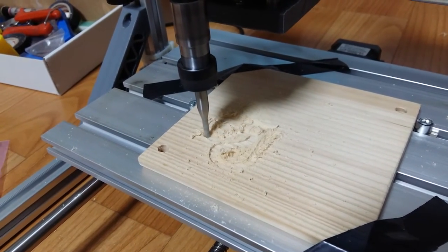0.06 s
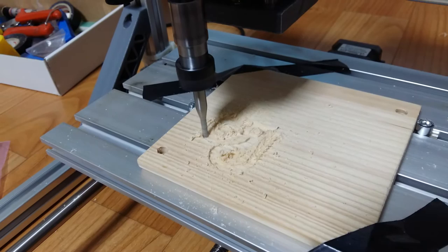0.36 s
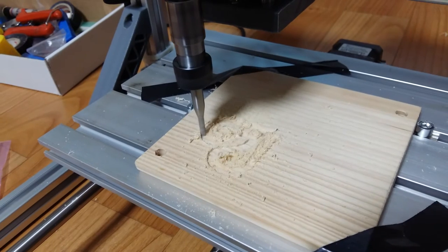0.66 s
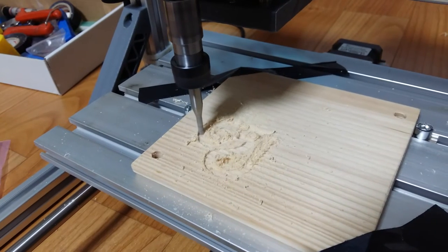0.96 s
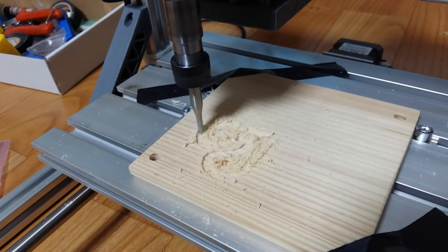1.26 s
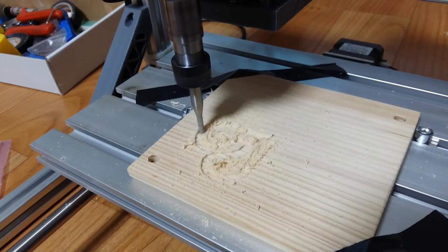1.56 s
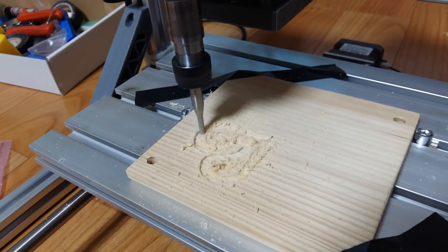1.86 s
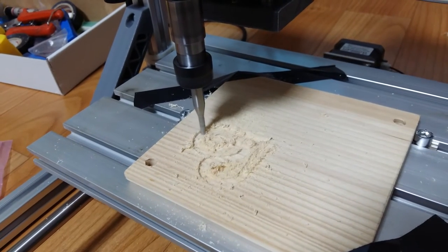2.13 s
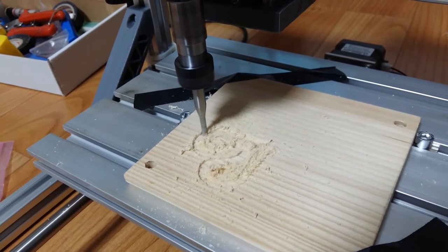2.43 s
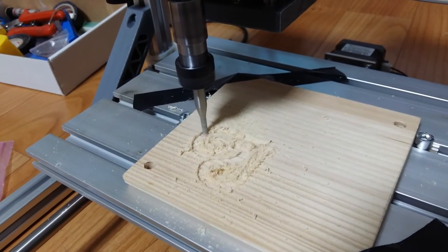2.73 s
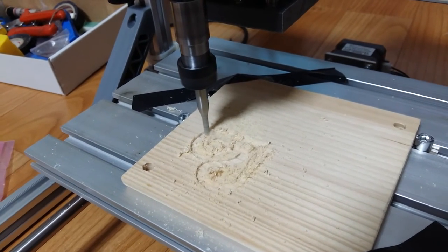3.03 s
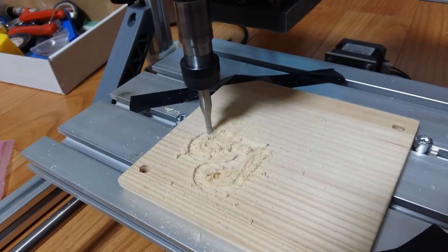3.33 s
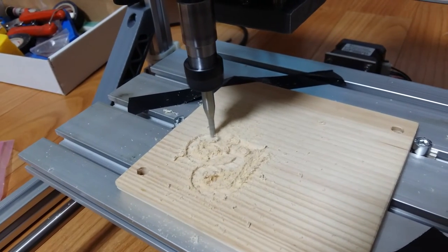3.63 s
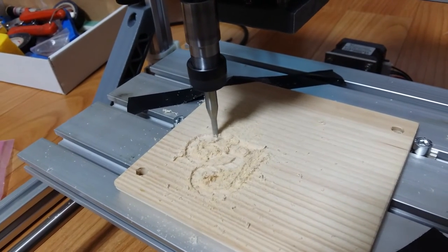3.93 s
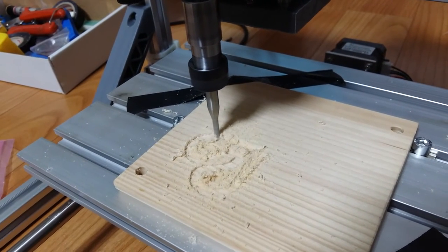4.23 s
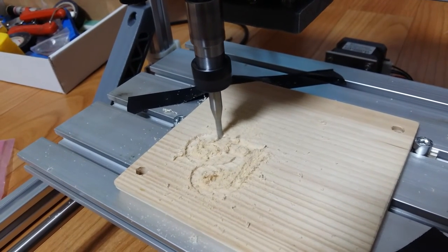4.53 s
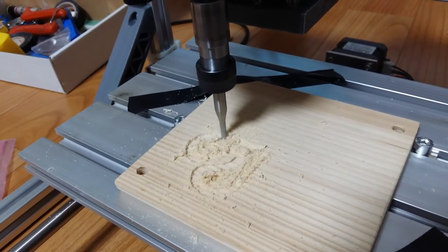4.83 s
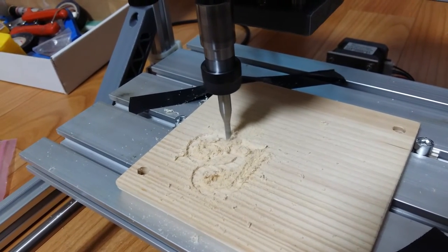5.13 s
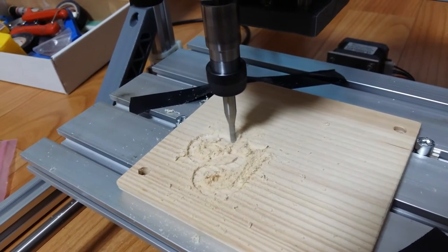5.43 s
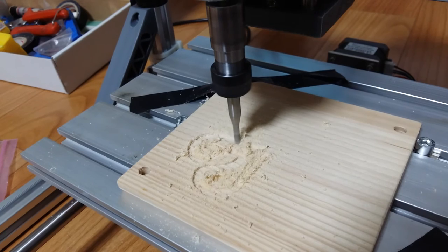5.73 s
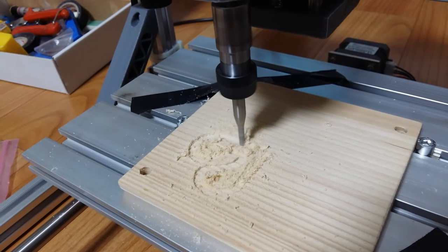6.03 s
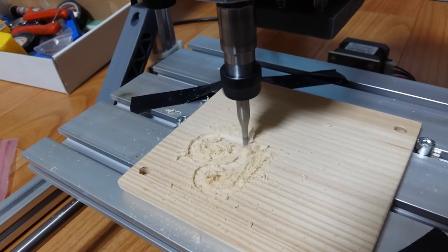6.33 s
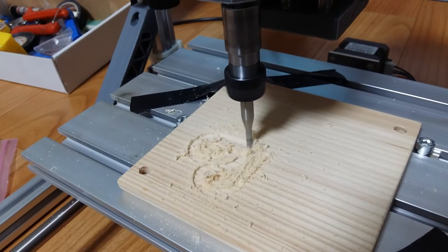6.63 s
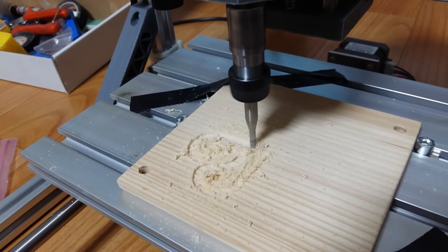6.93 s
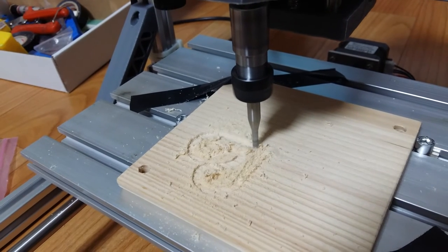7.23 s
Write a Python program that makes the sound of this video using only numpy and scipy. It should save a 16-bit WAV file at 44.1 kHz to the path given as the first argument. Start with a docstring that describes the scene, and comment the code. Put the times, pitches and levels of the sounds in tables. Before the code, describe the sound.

A small CNC router carves a wooden board, heard close on a hand-held stereo microphone in a small room. Its spindle whines at high speed for the whole seven seconds, over a light hum, with scraping motor brushes, a thin high bearing rattle and a fizz of dust that grows slightly. The pitch barely dips under load. Faint feed motor tones sit behind it until about 2.5 seconds.

In front, the bit bites the wood with a buzzing chatter and a dry rasp of tearing fibres. The bites are short and irregular for the first two seconds, with a small splinter cracking off near 0.4. The cutting eases from about 2.2 to 2.7, resumes with a faint splinter, tears harder around 3.4, then continues in longer, steadier passes to the end. Brief squeals come from the bit, mostly in the first three seconds, and again near 4.2, 4.6 and 6.2.

```python
"""A small room, a hand-held stereo microphone close to a small CNC router carving a wooden board.
Feed motors sing faintly behind the spindle, which turns about 151 times a second: it hums and whines
on its shaft orders (multiples of that rate), its brushes scrape and its bearings rattle near 6 kHz.
In front, the bit shakes the frame near 1.2 kHz as it bites, tears fibres and squeals in the grain;
dust fizzes off it and a few splinters break away."""
import sys
import numpy as np
from scipy import signal
from scipy.fft import rfft, irfft, next_fast_len
from scipy.io import wavfile

SR = 44100
rng = np.random.default_rng(int(sys.argv[2]) if len(sys.argv) > 2 else 0)


def generate_wav(signal):
    """Clip the signal to [-1, 1] and save it as 16-bit WAV at the path in sys.argv[1]."""
    frames = np.transpose(np.atleast_2d(signal))
    scaled = np.clip(frames, -1, 1) * 32767
    pcm = np.round(scaled).astype(np.int16)
    wavfile.write(sys.argv[1], SR, pcm)


N = 320607

# How alike noise is on the two sides of the microphone: frequency_hz, correlation
STEREO_LIKENESS = [(200, 0.89), (1300, 0.59), (2500, 1), (5000, 0.017), (12000, 0.027)]
# Feed motor notes: start_s, end_s, pitch_hz, level_db
FEED_NOTES = [(-.2, 2.2, 900, -48), (-.2, 2.5, 936, -53.5)]
# The spindle slows where the cut is heavy: time_s, turns_per_s
SPINDLE_SPEED = [(.2, 151.4), (.5, 150.3), (.65, 151.2), (.82, 150.6), (1.15, 151.05), (1.65, 151.15),
                 (2.08, 150.25), (2.4, 151.1), (2.8, 151.15), (3.2, 150.15), (3.36, 150.9), (3.56, 150.15),
                 (3.9, 151.05), (4.5, 151.05), (4.75, 151.4), (5.3, 151.35), (5.55, 151.7)]
# Slow levels of the lowest shaft orders: time_s, unbalance_db, second_order_db, side_load_db
HUM_LEVELS = [(0, -55, -62.5, -47), (1.05, -52.5, -65, -44.5), (2.3, -52.5, -54, -41), (3, -52, -50, -42.5),
              (4, -49.5, -54, -40), (6.3, -50, -56, -43), (7.27, -50, -60, -40.5)]
# Shaft orders 3 to 6, relative to the side load: gain_db
SIDE_LOAD_ORDERS = [-5.5, -9.5, -1.5, -5.5]
# Slow levels of the motor's bands: time_s, low_whine_db, high_whine_db, housing_db
MOTOR_BANDS = [(0, -31, -23, -16), (.45, -29, -18.5, -23), (1.15, -26.5, -22, -20),
               (1.9, -25.5, -20.5, -21.5), (2.5, -29, -22.5, -24.5), (3, -26.5, -19, -29.5),
               (3.7, -28, -19.5, -26), (5.1, -25.5, -19, -25.5), (6.4, -32, -19.5, -24),
               (7.27, -28, -20.5, -26)]
# Shaft orders from 10 upwards: level_db, trend_db_per_s, left_over_right_db, right_lag_rad
WHINE_ORDERS = [(-40, 0, 3, 1.5), (-43, 2, -9, 2.5), (-38.5, -0.5, 3.5, 1.86), (-46.5, -1.6, 4, 0.3),
                (-33.5, 0.56, -3, 1.3), (-37.5, 0.85, -4, 1.75), (-40, -1.0, -3, 2.5),
                (-37.5, 0.1, -1.5, 2.5), (-45, 0, -13, 1.5), (-49, 2.5, 4, 2), (-39, -0.5, -1.5, 0.87),
                (-36, -0.1, 2, 2.9), (-37, 1, -1, 1.9), (-40.5, 0.3, -4, 2), (-41, 0, -5.5, -1),
                (-36, -1, 6.5, 3), (-47, 0.5, 8, -1), (-38.5, 1.3, 20, 0.5), (-40, 0.5, 12, 0.5),
                (-38, -2, -4, 3.5), (-47, 3, 0, -2), (-42, -1.4, -11, 0.5), (-36, 1.9, 0, 2),
                (-32.5, 0.8, -18, 3.0), (-39.5, -0.5, -9, 0), (-40.5, 1.3, -17, 0.2),
                (-31, 0.4, -10.5, 2.5), (-28, 0.3, -3, 1.5), (-35, -0.5, -10, 2), (-30.5, 0.5, -3, 1.5),
                (-29, 0.5, 7, -1.2), (-31, 0.6, -7.5, 1.5), (-31.5, -1, -5, 4.5)]
# Spectra of the brushes, the dust and the bearings: frequency_hz, relative_db
BRUSH_SPECTRUM = [(50, -33), (200, -18.5), (500, -16), (850, -4), (1700, -4.5), (2200, -1.5), (2800, -4),
                  (3300, -0.5), (3900, -5.5), (4150, 2), (4500, -7), (6000, -10), (9000, -43)]
DUST_SPECTRUM = [(4000, -32), (7000, 2), (8300, -2.5), (9300, 3), (9800, -2), (12200, -8.5), (14000, -10.5),
                 (15700, -17)]
BEARING_SPECTRUM = [(2000, -54), (4500, -40), (5500, -24), (6000, 1), (6450, 0.5), (6900, -10), (7800, -17),
                    (12000, -37)]
# Where the bearings sit in the stereo image: frequency_hz, left_over_right_db
BEARING_PAN = [(5600, 2.5), (6030, 13), (6200, -28), (6500, 96), (7800, -31)]
# Resonances of the collet and of the frame: pitch_hz, width_hz, relative_db
COLLET_MODES = [(5587, 440, 0)]
FRAME_MODES = [(1069, 23.5, 6), (1230, 39, 6), (1347.7, 19.3, 12.5)]
# The collet's ring, loudest where the bit digs hard: time_s, level_db
COLLET_LEVELS = [(0, -29), (.3, -23), (.45, -19.5), (.78, -26), (1.15, -21.5), (1.3, -29), (2.5, -25),
                 (2.8, -22.5), (3.3, -23), (3.49, -19.5), (3.7, -24), (7.27, -25)]
# Splinters breaking away: middle_s, half_length_s, level_db
SPLINTER_BREAKS = [(.415, .015, -27), (.437, .002, -23), (2.79, .03, -33)]
# The bit sings briefly on one order: middle_s, half_length_s, shaft_order, level_db
BIT_SQUEALS = [(0.062, 0.12, 24, -32.5), (.03, 0.12, 27, -35), (.66, 0.07, 15, -30), (.48, .2, 37, -28),
               (1.2, .5, 37, -33), (1.02, .035, 14, -28.5), (1.15, .25, 33, -35), (1.27, .05, 12, -33),
               (1.62, 0.16, 33, -32), (2.206, 0.045, 14, -27.5), (2.96, 0.064, 14, -27.5),
               (3.11, 0.05, 5, -36), (4.19, 0.05, 14, -30), (4.57, .12, 15, -32), (6.196, .05, 22, -29.5)]
# Spectra of tearing fibres and of snaps knocking the board: frequency_hz, relative_db
TEAR_SPECTRUM = [(400, -21), (1200, -7), (1750, -6), (2250, 8), (2700, -2), (3130, 5), (3800, -15),
                 (5600, -8), (9000, -40)]
SNAP_SPECTRUM = [(250, -55), (750, -16), (1050, 0), (1380, 0), (1650, -14), (2250, -6), (6000, -50)]
# The bit's bites of wood: start_s, length_s, chatter_db, chatter_centre_hz, tear_db
WOOD_BITES = [(-0.05, 0.3, -23, 1273, -30.5), (0.284, 0.26, -27, 1144, -23.5),
              (0.613, 0.18, -20.5, 1236, -27), (0.902, 0.058, -34, 1380, -25.5),
              (0.98, 0.076, -25, 1240, -22.5), (1.093, 0.12, -22.5, 1210, -29.5),
              (1.275, 0.088, -26.5, 1260, -65), (1.524, 0.072, -24, 1460, -40),
              (1.668, 0.22, -27.5, 1300, -38), (1.853, 0.22, -24.5, 1230, -29.5),
              (2.038, 0.15, -24.5, 1304, -42), (2.684, 0.17, -36, 1240, -26), (2.867, 0.17, -27, 1260, -28),
              (3.047, 0.071, -28, 1340, -35), (3.105, 0.29, -31, 1205, -26),
              (3.399, 0.075, -24.5, 1080, -21), (3.484, 0.19, -25.5, 1260, -28.5),
              (3.61, 0.17, -24, 1305, -60), (3.594, .32, -32.5, 1040, -34.5), (3.898, 0.33, -24, 1214, -60),
              (4.3, 0.28, -26.5, 1205, -28), (4.594, 0.92, -29.5, 1152, -30.5), (5.5, 0.39, -30, 1190, -32),
              (5.81, 0.24, -24.5, 1207, -99), (6.041, 0.72, -22, 1147, -37),
              (6.738, 0.56, -26, 1077, -32.5)]

TOP_HZ = 15700
SCRAPE_DB, RATTLE_DB, WHINE_GAIN_DB = -12, -22.5, .8  # the scrape is relative to the high whine band
HUM_PER_EFFORT, WHINE_PER_EFFORT, RATTLE_PER_EFFORT = 0.23, 0.22, 0.028  # dB per dB of cutting effort
FLUTTER, FLUTTER_HZ_PER_ORDER = .75, 1.25  # no two turns are alike, so higher orders are broader
ATTACK_S, RELEASE_S, ARCH_DB = .05, .06, 3  # a bite sinks in, is deepest in its middle, and runs free
CHATTER_ORDERS, CHATTER_WIDTH_HZ = (7, 8, 9), 173.5  # the orders a bite shakes; reach from its centre
GRAZE_CHATTER_DB, GRAZE_CENTRE_HZ, GRAZE_TEAR_DB = -33, 1296, -36.5  # the bit only brushing the groove
GRAIN_DB, GRAIN_HZ = 1.3, 7  # uneven grain makes each chatter order waver
STUTTER_DB, STUTTER_HZ = 1.9, 16
SNAP_DB, SNAP_SPREAD_DB = -3.5, 4.5  # level beside the tearing; spread from turn to turn


def amp(db):
    """Decibels to gain."""
    return 10 ** (np.asarray(db) / 20)


def unit(x):
    """Scale to rms 1."""
    return x / np.sqrt(np.mean(np.abs(x) ** 2) + 1e-20)


def along(points, hz):
    """Read (frequency_hz, value) points on a log axis."""
    point_hz, values = np.transpose(points)
    return np.interp(np.log(hz + 1), np.log(point_hz + 1), values)


def clock():
    """The time of every sample, in seconds."""
    return np.arange(N) / SR


def curves(rows):
    """One value per sample for each column after the time."""
    times, *columns = np.transpose(rows)
    return [np.interp(clock(), times, column) for column in columns]


def centred(curve):
    """A curve about its own average."""
    return curve - np.mean(curve)


def pan(side_db):
    """Left and right gains of constant power; positive is to the left."""
    gains = amp(np.array([np.atleast_1d(side_db), -np.atleast_1d(side_db)]) / 2)
    return gains / np.sqrt(np.mean(gains ** 2, axis=0))


def drift(corner_hz, skirt=10):
    """A random complex curve of rms 1, mostly slower than corner_hz, steeply cut past skirt times that."""
    step = 64
    count = N // step + 2
    hz = np.fft.fftfreq(count, step / SR)
    white = rng.standard_normal(count) + 1j * rng.standard_normal(count)
    slow = np.fft.ifft(white / (1 + 1j * hz / corner_hz) / (1 + 1j * hz / corner_hz / skirt))
    return np.interp(np.arange(N), np.arange(count) * step, unit(slow))


def filtered(x, response):
    """x through a complex frequency response."""
    size = next_fast_len(N + SR // 4)
    return irfft(rfft(x, size) * response(np.fft.rfftfreq(size, 1 / SR)), size)[..., :N]


def noise():
    """White stereo noise, largely alike on both sides low down and unrelated in the treble."""
    def mid_side_gains(hz):
        spread = np.arccos(np.clip(along(STEREO_LIKENESS, hz), -1, 1)) / 2
        return np.array([np.cos(spread), np.sin(spread)])
    mid, side = filtered(rng.standard_normal((2, N)), mid_side_gains)
    return np.array([mid + side, mid - side])


def coloured(x, spectrum):
    """x through a smooth spectrum, at rms 1."""
    return unit(filtered(x, lambda hz: amp(along(spectrum, hz))))


def ringing(x, modes):
    """x through steep-skirted resonances (pitch_hz, width_hz, relative_db), at rms 1."""
    def mode(hz, pitch, width):
        return 1j * hz * width / (pitch * pitch - hz * hz + 1j * hz * width)
    return unit(filtered(x, lambda hz: sum(amp(db) * mode(hz, pitch, width) * mode(hz, pitch, 5 * width)
                                           for pitch, width, db in modes)))


def diffuse(x, t60_s):
    """x through a dense short tail for each side, at rms 1."""
    t = np.arange(SR // 5) / SR
    tail = rng.standard_normal((2, len(t))) * amp(-60 * t / t60_s)
    return unit(signal.fftconvolve(x[None], tail, axes=1)[:, :N])


def partial(phase, rough, width_hz, lag_rad, skirt=10):
    """A fluttering stereo tone of rms 1; the right lags, and each side also flutters on its own."""
    own = np.array([drift(width_hz, skirt), drift(width_hz, skirt)]) * (rough * min(abs(lag_rad), 1) / 2)
    shared = 1 + rough * drift(width_hz, skirt)
    offset = np.exp(.5j * lag_rad * np.array([[1], [-1]]))
    return unit(((offset * shared + own) * np.exp(1j * phase)).real)


def stutter(depth=1):
    """The unsteady gain of a chip that thickens and thins; depth 0 is a smooth cut."""
    return unit(amp(depth * STUTTER_DB * drift(STUTTER_HZ, skirt=2).real))


def feed_motors():
    """Far back in the sound, stepper motors hold faint notes while they feed the table."""
    t, out = clock(), np.zeros((2, N))
    for start, end, hz, db in FEED_NOTES:
        fade = np.clip(np.minimum(t - start, end - t) / 0.22, 0, 1)
        out += amp(db) * fade * partial(2 * np.pi * hz * t, rough=0.29, width_hz=0.93, lag_rad=0.36)
    return out


def shaft_hum(angle, effort_db):
    """Unbalance drives the first two orders; the side load on the bit drives the next four."""
    unbalance_db, second_db, side_load_db = curves(HUM_LEVELS)
    load_db = side_load_db + HUM_PER_EFFORT * effort_db
    out = pan(-1.8) * amp(unbalance_db) * partial(angle, rough=0.27, width_hz=11.0, lag_rad=0.29)
    out += pan(2.6) * amp(second_db) * partial(2 * angle, rough=0.41, width_hz=8.8, lag_rad=0.24)
    for order, db in enumerate(SIDE_LOAD_ORDERS, 3):
        out += pan(1.1) * amp(db + load_db) * partial(order * angle, rough=.75, width_hz=6, lag_rad=0.34)
    return out


def brushes_and_dust(angle, high_whine_db):
    """Brushes scrape and tick each turn; dust fizzes off the bit, which whistles and rings ever more."""
    pulse = amp(1.3 * np.cos(angle) + 1.8 * np.cos(2 * angle) + drift(8).real)
    scrape = amp(high_whine_db + SCRAPE_DB) * coloured(noise() * pulse, BRUSH_SPECTRUM)
    ticks = np.diff(np.floor(angle / (2 * np.pi)), prepend=0)
    fizz = unit(noise() * np.sqrt(pulse)) + amp(-9) * diffuse(ticks, t60_s=.05)
    progress = clock() * SR / N
    dust = amp(-33.5 + 2 * progress + 1.4 * drift(17).real) * coloured(fizz, DUST_SPECTRUM)
    ring = amp(-48.5 + 10.6 * progress) * pan(3) * ringing(fizz, [(8660, 85, 1), (8680, 71, -6)])
    whistle = amp(-53) * ringing(fizz, [(13100, 110, 0)])
    return scrape + dust + ring + whistle


def bearing_rattle(angle, effort_db, collet_db, scatter_s, uneven_db, diffuse_db):
    """The shaft rubs and knocks three times a turn, never quite alike, ringing bearings and collet."""
    turns = angle / (2 * np.pi)
    whole_turns = np.arange(int(turns[-1]))
    knocks = np.zeros(N)
    for turn_fraction, db in [(.05, -18), (.5, -10.5), (.72, -9)]:
        timing, strength = rng.standard_normal((len(whole_turns), 2)).T
        at_s = np.interp(whole_turns + turn_fraction, turns, clock()) + scatter_s * timing
        samples = np.clip(np.round(at_s * SR).astype(int), 0, N - 1)
        knocks += np.bincount(samples, amp(db + uneven_db * strength), N)
    rub = unit(noise() * amp(4.5 * np.cos(2 * angle) + 3.5 * np.cos(angle)))
    drive = unit(knocks) + amp(diffuse_db) * diffuse(knocks, t60_s=0.19) + 1.7 * rub
    bearings = filtered(coloured(drive, BEARING_SPECTRUM), lambda hz: pan(along(BEARING_PAN, hz)))
    collet = pan(-20) * ringing(drive, COLLET_MODES)
    return amp(RATTLE_DB + RATTLE_PER_EFFORT * effort_db) * bearings + amp(collet_db) * collet


def motor_whine(angle, bands_db):
    """Commutator, fan and flute repeat every turn; each order flutters and slowly grows or fades."""
    swells_db = [centred(db) for db in bands_db]
    from_middle_s = centred(clock())
    out = np.zeros((2, N))
    for order, (db, trend, side_db, lag_rad) in enumerate(WHINE_ORDERS, 10):
        # each order swells with the part of the machine that rings at its pitch
        band = np.searchsorted([19, 32, 40], order, side="right")
        phase = order * angle + rng.uniform(0, 2 * np.pi)
        tone = partial(phase, FLUTTER, FLUTTER_HZ_PER_ORDER * order, lag_rad, skirt=1.0)
        out += pan(side_db) * amp(db + swells_db[band] + trend * from_middle_s) * tone
    return amp(WHINE_GAIN_DB) * stutter(depth=.5) * out


def thud(middle_s, half_length_s, level_db):
    """One soft low thud."""
    rumble = coloured(noise(), [(110, 0), (250, -31), (800, -90)])
    return amp(level_db) * np.exp(-((clock() - middle_s) / half_length_s) ** 2) * rumble


def splinters():
    """Each splinter breaks away with a short broad rasp."""
    rasp = coloured(noise(), [(200, -40), (1200, 0), (4500, -3), (12000, -22)])
    return rasp * sum(amp(db) * np.exp(-((clock() - middle_s) / half_s) ** 2)
                      for middle_s, half_s, db in SPLINTER_BREAKS)


def bit_squeals(angle):
    """Where the grain grips the bit, one order sings out roughly, stutters and breaks off."""
    grips, out = {}, np.zeros((2, N))
    for middle_s, half_s, order, db in BIT_SQUEALS:
        grip = amp(db) * np.clip(2 - 1.6 * np.abs(clock() - middle_s) / half_s, 0, 1)
        grips[order] = grips.get(order, 0) + grip
    for order, grip in grips.items():
        width_hz = FLUTTER_HZ_PER_ORDER * order / 2
        out += grip * stutter() * partial(order * angle, rough=.8, width_hz=width_hz, lag_rad=.7, skirt=2)
    return out


def fibre_snaps(angle):
    """Once a turn the flute snaps a fibre of uneven strength: a short dry knock in the board."""
    ticks = np.diff(np.floor(angle / (2 * np.pi) + .5), prepend=0)
    snaps = ticks * amp(SNAP_SPREAD_DB * rng.standard_normal(N)) * rng.choice([-1, 1], N)
    return coloured(diffuse(snaps, t60_s=.012), SNAP_SPECTRUM)


def bite_levels(orders_hz):
    """Each bite shakes the orders near its centre and tears fibres; gives chatter and tear in dB."""
    def near(centre_hz):
        return 1 / (1 + ((np.array(orders_hz)[:, None] - centre_hz) / CHATTER_WIDTH_HZ) ** 2) ** 2
    chatter, tear, free = np.zeros((len(orders_hz), N)), np.zeros(N), np.ones(N)
    for start_s, length_s, chatter_db, centre_hz, tear_db in WOOD_BITES:
        age_s = clock() - start_s
        depth = np.clip(np.minimum(age_s / ATTACK_S, 1 - (age_s - length_s) / RELEASE_S), 0, 1)
        free *= 1 - depth
        arch = np.sin(np.pi * np.clip(age_s / (length_s + RELEASE_S), 0, 1))
        depth *= amp(ARCH_DB * (arch - 1))
        chatter += amp(chatter_db) * near(centre_hz) * depth
        tear += amp(tear_db) * depth
    chatter = np.hypot(chatter, free * amp(GRAZE_CHATTER_DB) * near(GRAZE_CENTRE_HZ))
    tear = np.hypot(tear, amp(GRAZE_TEAR_DB))
    return 20 * np.log10(chatter), 20 * np.log10(tear)


def cutting(angle, chatter_db, tear_db):
    """Up front, the flute strikes once a turn: the frame chatters and torn fibres ring it in bursts."""
    # the frame's resonance delays each order differently, which spreads the blow over the turn
    phases = [order * angle - 0.97 * (order - CHATTER_ORDERS[1]) ** 2 for order in CHATTER_ORDERS]
    tones = [partial(phase, rough=.18, width_hz=10, lag_rad=.4) for phase in phases]
    chatter = sum(pan(side_db) * amp(db + GRAIN_DB * drift(GRAIN_HZ).real) * tone
                  for tone, db, side_db in zip(tones, chatter_db, (1, 7.5, 8.5)))
    bursts = noise() * amp(-2 * np.cos(angle))
    fibres = pan(4) * ringing(bursts, FRAME_MODES) + amp(-9.5) * coloured(bursts, TEAR_SPECTRUM)
    tearing = np.minimum(amp(tear_db - chatter_db.max(axis=0)), 1)
    chatter *= stutter(tearing)  # a clean cut holds steady, a tearing one stutters
    snaps = pan(1.9) * amp(SNAP_DB) * fibre_snaps(angle)
    return chatter + amp(tear_db - 3.0) * (fibres + snaps)


def scene():
    """The router from close by: motor and cut follow the trembling shaft and the effort of the bites."""
    turns_per_s, = curves(SPINDLE_SPEED)
    angle = 2 * np.pi * np.cumsum(turns_per_s) / SR + 0.03 * drift(5.4).real
    chatter_db, tear_db = bite_levels([order * turns_per_s.mean() for order in CHATTER_ORDERS])
    effort_db = centred(20 * np.log10(amp(chatter_db).mean(axis=0) + amp(tear_db)))
    low_whine_db, high_whine_db, housing_db = curves(MOTOR_BANDS)
    low_whine_db += WHINE_PER_EFFORT * effort_db
    collet_db, = curves(COLLET_LEVELS)
    motor = shaft_hum(angle, effort_db)
    motor += motor_whine(angle, [low_whine_db, high_whine_db, housing_db, collet_db])
    motor += brushes_and_dust(angle, high_whine_db)
    motor += bearing_rattle(angle, effort_db, collet_db, scatter_s=.00005, uneven_db=2.0, diffuse_db=4.5)
    wood = thud(middle_s=.44, half_length_s=.012, level_db=-48) + splinters()
    wood += cutting(angle, chatter_db, tear_db) + bit_squeals(angle)
    return feed_motors() + motor + wood


def record(dry):
    """The hand-held recorder passes nothing above its band limit."""
    return filtered(dry, lambda hz: hz < TOP_HZ)


dry = scene()
out = record(dry)
generate_wav(out)
```